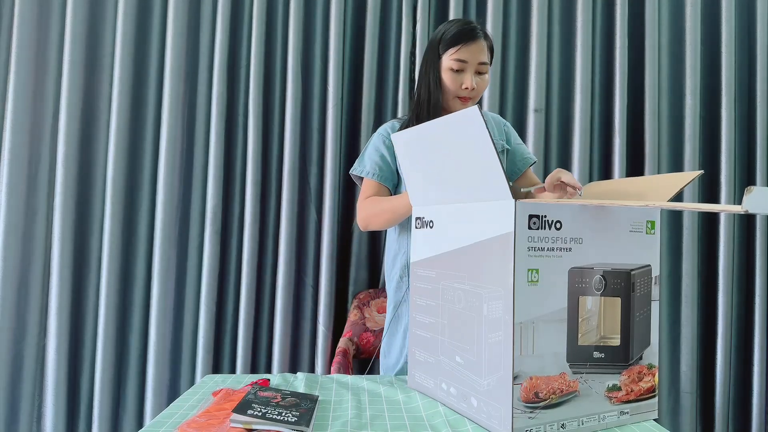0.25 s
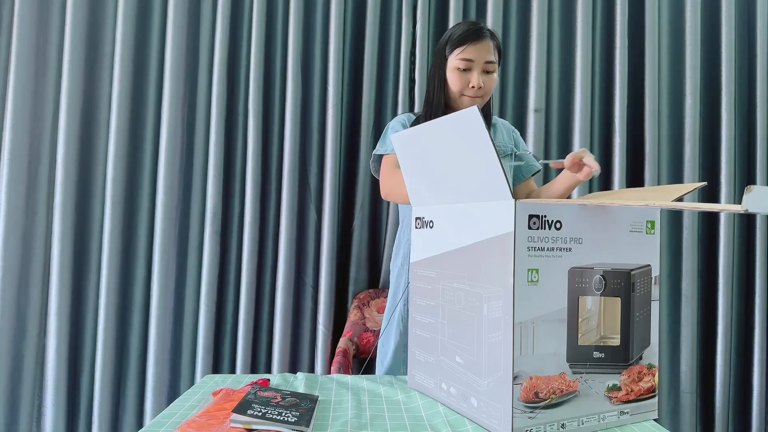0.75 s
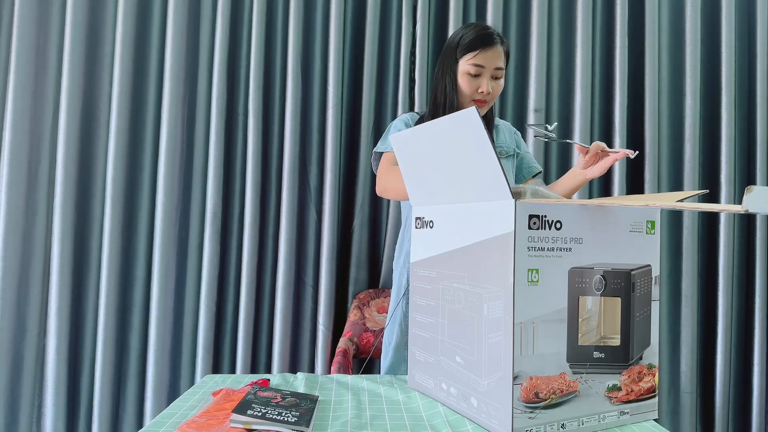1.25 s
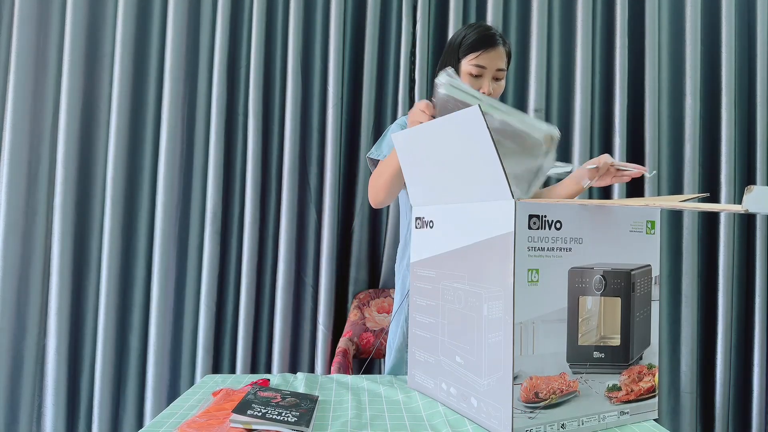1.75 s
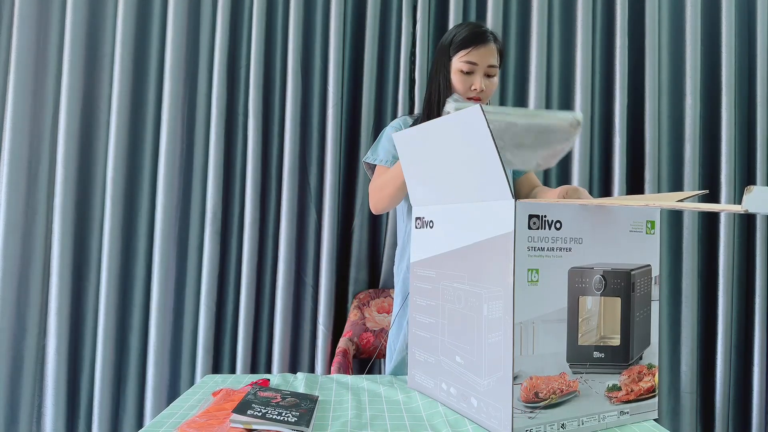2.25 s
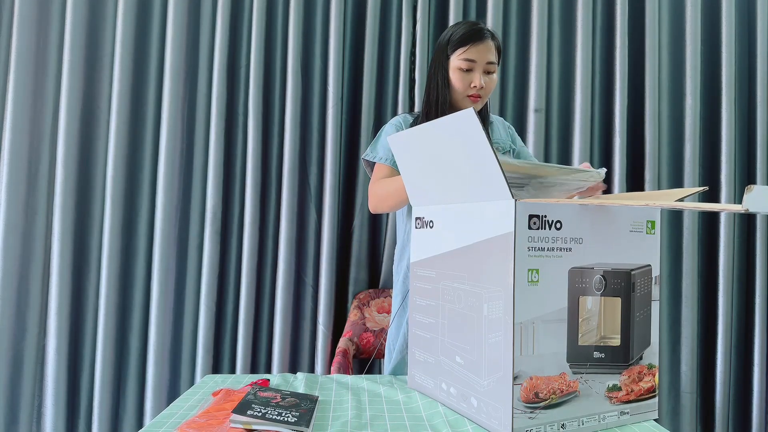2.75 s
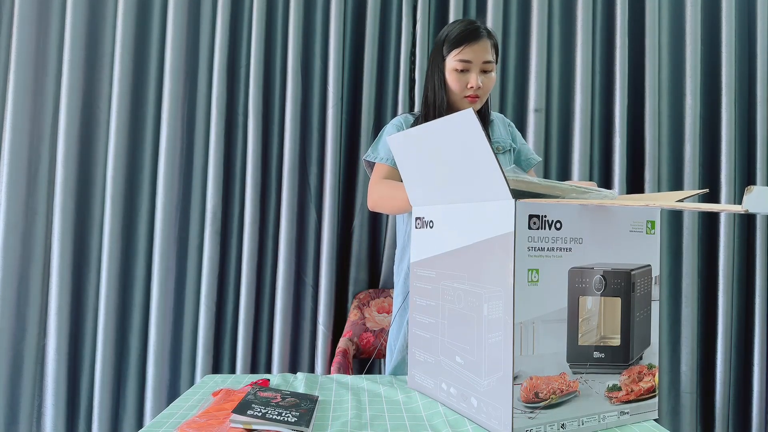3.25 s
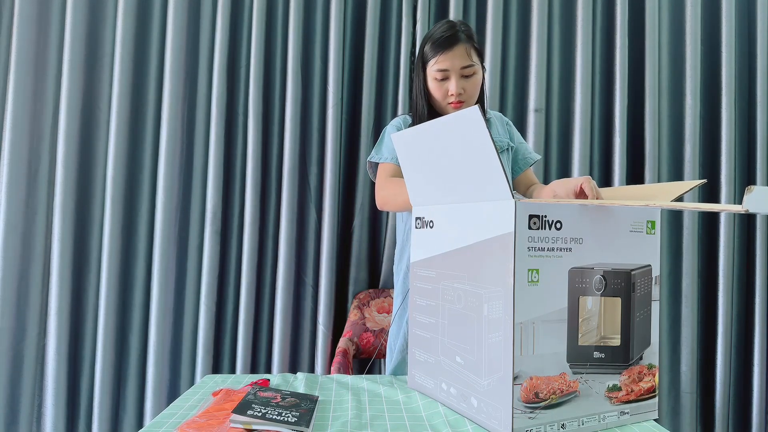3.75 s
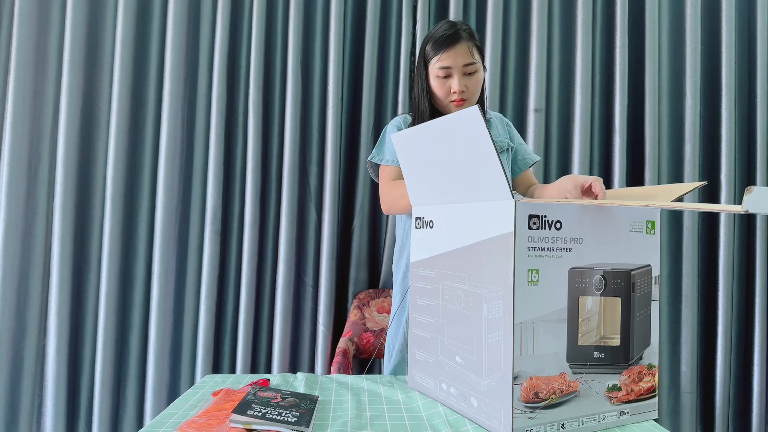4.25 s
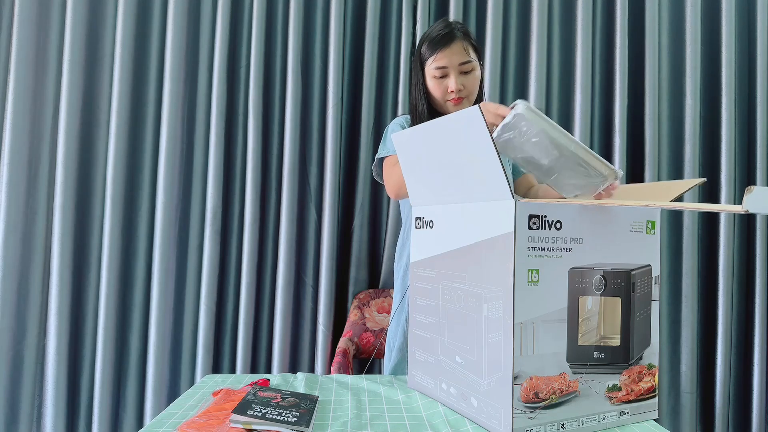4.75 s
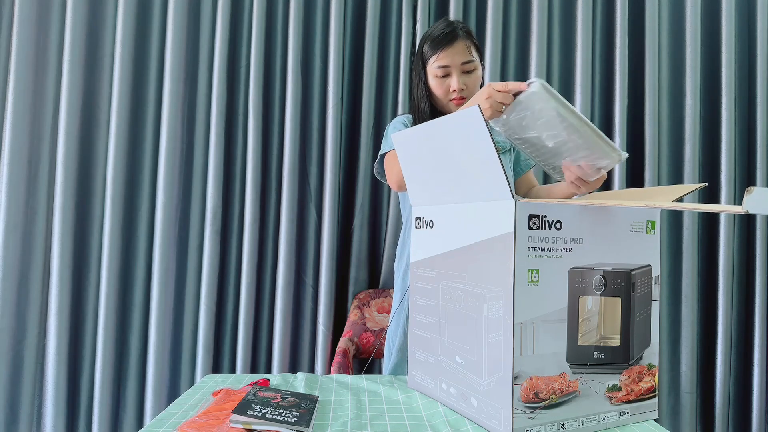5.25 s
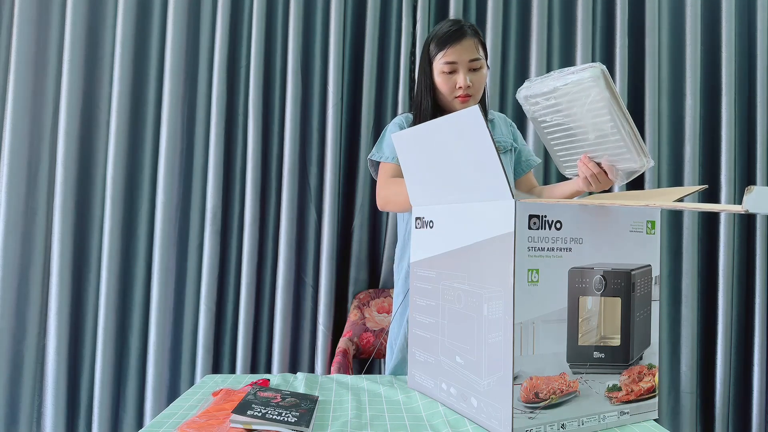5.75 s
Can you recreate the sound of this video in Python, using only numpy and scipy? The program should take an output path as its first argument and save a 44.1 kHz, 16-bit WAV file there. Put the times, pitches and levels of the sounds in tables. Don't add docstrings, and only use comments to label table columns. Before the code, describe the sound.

Plastic film crackles and wire racks knock a hollow cardboard carton as packed parts are lifted out, ending with a metallic tray clank.

```python
import sys
import numpy as np
from scipy import signal
from scipy.fft import rfft, irfft, next_fast_len
from scipy.io import wavfile
from scipy.ndimage import uniform_filter1d, map_coordinates

SR = 44100
rng = np.random.default_rng(int(sys.argv[2]) if len(sys.argv) > 2 else 0)


def natural_amplitude(level_db):
    exponent = np.asarray(level_db, float) / 20
    return 10 ** exponent


def wav_record(signal):
    frames = np.transpose(np.atleast_2d(signal))
    bounded = np.clip(frames, -1, 1)
    quanta = np.round(bounded * 32767).astype(np.int16)
    wavfile.write(sys.argv[1], SR, quanta)


N = 264159


def unit(x):
    return x / np.sqrt(np.mean(x ** 2) + 1e-20)


def along(points, hz):
    f, v = np.transpose(points)
    return np.interp(np.log(hz + 1), np.log(f + 1), v)


def wobble(rate):
    knots = rng.standard_normal(int(N * rate / SR) + 4)
    return map_coordinates(knots, [np.arange(N) * rate / SR])


def filtered(x, points):
    m = next_fast_len(N + 8192)
    gain = natural_amplitude(along(points, np.fft.rfftfreq(m, 1 / SR)))
    return irfft(rfft(x, m) * gain, m)[..., :N]


def coloured(x, spectrum):
    return unit(filtered(x, [(1, -120)] + list(spectrum)))


def swells(rows):
    t = np.arange(0, N, 32) / SR
    s, db, rise, fall = np.transpose(rows)[:, :, None]
    below_peak = 10 * np.maximum((s - t) / rise, (t - s) / fall)
    power = natural_amplitude(2 * (db - below_peak)).sum(axis=0)
    return np.interp(np.arange(N) / SR, t, np.sqrt(power))


def add(track, s, sound):
    spot = track[round(s * SR):][:len(sound)]
    spot += sound[:len(spot)]


def grit(rate, low_hz, high_hz, cycles, spread_db, clump_db, clump_rate, hiss):
    when, pitch, size = rng.random((round(rate * N / SR), 3)).T[:, :, None]
    hz = low_hz * (high_hz / low_hz) ** pitch
    step = np.arange(round(3 * cycles * SR / low_hz))
    level = natural_amplitude(spread_db * np.minimum(-np.log(size), 4)) * np.sqrt(hz)
    tick = level * np.sin(2 * np.pi * hz * step / SR) * np.exp(-step * hz / SR / cycles)
    spots = (when * N).astype(int) + step
    ticks = np.bincount(spots.ravel(), tick.ravel(), N)[:N]
    return natural_amplitude(clump_db * wobble(clump_rate)) * (unit(ticks) + hiss * rng.standard_normal(N))


def ring(modes, t, damping, scatter_db):
    hz, db, t60 = np.transpose(modes)[:, :, None]
    level = natural_amplitude(db + scatter_db * rng.standard_normal(db.shape))
    decay = np.exp(-np.log(1000) * damping * t / t60)
    return (level * decay * np.sin(2 * np.pi * (hz * t + rng.random(hz.shape)))).sum(axis=0)


def struck(modes, rattle, loose_db, scatter_db):
    t = np.arange(SR // 6) / SR
    blow = ring(modes, t, 0.0049 / rattle, scatter_db) * (1 - np.exp(-t / 0.00066))
    chatter = rng.standard_normal(len(t)) * np.exp(-t / (1.7 * rattle)) * (1 - np.exp(-t / 0.001))
    brief = t[:SR // 20]
    damped = ring(modes, brief, 8.0, scatter_db) * np.minimum(brief / 0.00047, 1)
    buzz = signal.fftconvolve(damped, chatter)[:len(t)]
    sound = blow / np.abs(blow).max() + natural_amplitude(loose_db) * buzz / np.abs(buzz).max()
    fade = np.cos(np.pi / 2 * t / t[-1])
    return sound * fade / np.abs(sound).max()


def draught():
    # time in seconds, level in dB
    pushes = [(0.0, -40.5), (0.27, -36), (0.55, -27), (0.9, -30), (1.43, -36.5), (1.67, -28), (1.88, -48.5),
              (2.1, -27), (2.6, -46.5), (2.9, -36), (3.19, -37.5), (3.92, -42.5), (4.17, -34.5),
              (5.99, -36.5)]
    # peak in seconds, level in dB, rise and fall in seconds per 10 dB
    gusts = [(.01, -56, .1, .9), (.4, -40, .044, .6), (.68, -32, .05, .05), (1.18, -34, .12, .024),
             (1.33, -58, .076, .4), (2.13, -42, .044, .106), (2.69, -38.5, .23, .074),
             (3.31, -37, .025, .13), (4.36, -50, 1.6, .3), (4.85, -37, .04, .04), (5.1, -35, .04, .025),
             (5.29, -51, .05, .06), (5.69, -45, .096, .07), (5.85, -41, .35, .9)]
    # frequency in Hz, density in dB per Hz
    push_spectrum = [(1.8, -6.5), (3.0, 5.5), (16, -12), (25, -12), (32, -75.5), (55, -120)]
    buffet_spectrum = [(15, -71), (25, -2), (63, -6.5), (92, -13.5), (140, -26.5), (180, -18.5),
                       (310, -120)]
    s, db = np.transpose(pushes)
    push_level = natural_amplitude(np.interp(np.arange(N) / SR, s, db))
    push = push_level * coloured(rng.standard_normal(N), push_spectrum)
    lumps = natural_amplitude(2.24 * wobble(18)) * rng.standard_normal(N)
    return push + swells(gusts) * coloured(lumps, buffet_spectrum)


def hush():
    # frequency in Hz, density in dB per Hz
    hum_spectrum = [(59, -39), (100, -0.5), (145, -17), (207, -6.5), (373, -21), (804, -22), (1170, -21.5),
                    (1840, -30), (11000, -41.5), (14300, -78), (22000, -120)]
    return natural_amplitude(-66 + 0.5 * wobble(2.8)) * coloured(rng.standard_normal(N), hum_spectrum)


def knock(boom_db, metal_db, loose_s):
    # frequency in Hz, level in dB, t60 in seconds
    wall_modes = [(444, -7, 0.055), (556.6, 10.5, 0.073), (596, -1.5, 0.055), (758, -14, 0.057),
                  (1004, -18, 0.15), (1000, -23, 0.14), (1100, -12, 0.07), (1310, -13, 0.044)]
    air_modes = [(192, -11, 0.12), (249, -4, 0.14), (270.3, -6, 0.26), (313, -6, 0.19), (347.3, -1.5, 0.1)]
    rack_modes = [(1520, -20, .07), (1600, -18, .06), (1815, 0, .11), (1885, -5, .07), (2300, -11, .05),
                  (3070, -6, .05), (3760, -9, .05), (4100, -9, .06), (4390, -10, .05), (5400, -13, .04),
                  (6220, -11, .04), (7470, -14, .04)]
    sound = struck(wall_modes, 0.67 * loose_s, loose_db=-1.6, scatter_db=2.1)
    sound += natural_amplitude(boom_db + 3) * struck(air_modes, 0.67 * loose_s, loose_db=-1, scatter_db=3.1)
    sound += natural_amplitude(metal_db + 1.7) * struck(rack_modes, 0.77 * loose_s, loose_db=2.0, scatter_db=2.0)
    return sound


def knocks():
    # start in seconds, wall peak in dB, metal above wall in dB, looseness in seconds
    taps = [(.012, -25, -5, .0033), (.071, -20.5, -10.5, .005), (.083, -29.5, 6, .0055),
            (.758, -35, -13, .0098), (1.203, -35.5, -9, .0036), (2.929, -30.5, -36, .0017),
            (2.953, -39, -20, .003), (3.204, -38, -20, .0053), (3.481, -8, -15, .0024),
            (3.518, -17, -30, .0021), (3.668, -36, -16, .005), (3.822, -47, -20, .0031),
            (3.9, -46.5, -.6, .0026), (4.142, -39.5, -21, .007), (4.163, -33, -9, .0097),
            (4.226, -32, -8, .009), (4.272, -38, -15, .0074), (4.316, -43, -33, .014),
            (4.615, -31, -15, .002), (5.293, -40, -5, .009)]
    # start in seconds, wall peak in dB, boom above wall in dB, metal above wall in dB
    thuds = [(.6, -38.5, -2, -14), (.712, -31, 0.5, -15), (.96, -47.5, 4.5, -14), (1.083, -42, 3, -6),
             (1.371, -44, -11, -8), (2.05, -41, 2.5, -7.5), (2.143, -49, 3, -18), (2.213, -40, -3, -14),
             (2.445, -41.5, -3, -20), (2.479, -45.5, 9, -21), (2.631, -25, 1.5, -43),
             (2.666, -41.5, 17, -30), (2.696, -55, 26, -28), (3.297, -9, -14.5, -4.5), (3.354, -21, -9, 0),
             (3.556, -34.5, -5, -4.5), (4.484, -39.5, -8, -12), (4.815, -39, -1, -8),
             (5.623, -40.5, 1, -10), (5.97, -28.5, -2, -10)]
    out = np.zeros(N)
    for s, db, metal_db, loose_s in taps:
        add(out, s, natural_amplitude(db - 1.2) * knock(-26, metal_db, loose_s))
    for s, db, boom_db, metal_db in thuds:
        add(out, s, natural_amplitude(db - 1.2) * knock(boom_db, metal_db, loose_s=0.0042))
    return out


def pocks():
    # start in seconds, peak in dB, frequency in Hz, t60 in seconds
    touches = [(.012, -30, 900, .05), (.071, -30, 1000, .05), (.085, -40, 1260, .2), (.085, -40, 1766, .2),
               (.085, -36, 600, .15), (.255, -46, 400, .04), (.28, -48, 480, .05), (.365, -44, 190, .05),
               (.41, -44, 720, .1), (.43, -46, 1100, .08), (.76, -45, 579, .3), (1.176, -44, 520, .04),
               (1.312, -47, 1500, .04), (1.349, -48, 1500, .03), (1.384, -44, 450, .08),
               (2.05, -50, 190, .1), (2.143, -54, 900, .07), (2.215, -52, 1400, .03),
               (2.58, -52, 1000, .03), (2.66, -38, 265, .3), (3.297, -22, 673, .07), (3.354, -30, 610, .12),
               (3.39, -34, 570, .08), (3.41, -36, 600, .08), (3.45, -38, 600, .06), (3.556, -38, 640, .1),
               (4.015, -49, 546, .06), (4.095, -41, 1660, .03), (4.122, -39, 1140, .025),
               (4.162, -39, 760, .12), (4.162, -39, 1700, .07), (4.226, -40, 430, .07),
               (4.273, -40, 1000, .02), (4.317, -41, 400, .05), (4.32, -45, 750, .15), (4.33, -46, 310, .4),
               (4.437, -47, 650, .05), (4.513, -45, 1500, .025), (4.54, -46, 1100, .03),
               (4.564, -44, 440, .04), (4.653, -41, 964, .04), (4.721, -43, 1250, .04),
               (4.778, -43, 800, .04), (5.025, -56, 1070, .07), (5.106, -47, 1600, .025),
               (5.293, -46, 1200, .06), (5.648, -46, 1100, .08), (5.763, -45, 1850, .02),
               (5.76, -46, 320, .04), (5.912, -42, 2540, .4)]
    out = np.zeros(N)
    t = np.arange(SR // 3) / SR
    shape = (1 - np.exp(-t / .0012)) * np.cos(np.pi / 2 * t / t[-1])
    for s, db, hz, t60 in touches:
        waver = uniform_filter1d(rng.standard_normal(len(t)), size=300)
        note = np.sin(2 * np.pi * hz * t + 6 * waver) * np.exp(-np.log(1000) * t / t60)
        add(out, s, natural_amplitude(db - 0.4) * note * shape)
    return out


def pop(hz):
    t = np.arange(SR // 100) / SR
    flip_s = .0007
    flip = rng.standard_normal(len(t)) * t * np.exp(-t / flip_s)
    sheet = np.sin(2 * np.pi * hz * t) * t * np.exp(-t * hz / 0.51)
    sound = np.convolve(flip, sheet)[:len(t)]
    return sound / np.abs(sound).max()


def snaps(rows, extra_db):
    out = np.zeros(N)
    for s, db, hz in rows:
        add(out, s, natural_amplitude(db + extra_db) * pop(hz))
    return out


def loud_creases():
    # start in seconds, peak in dB, centre in Hz
    film_creases = [(.0139, -37.5, 3030), (.0525, -33, 6450), (.0568, -27.5, 8700), (.0811, -25, 3530),
                    (.1944, -36, 10300), (.2437, -39.5, 7750), (.2568, -39.5, 6230), (.7141, -32, 5230),
                    (.7579, -27, 9290), (.7937, -33, 9300), (.822, -39, 8660), (.8757, -35.5, 8200),
                    (.9888, -37, 7650), (1.0003, -28.5, 7700), (1.0809, -34.5, 10300), (1.0897, -31, 10600),
                    (1.11, -28, 8000), (1.222, -37, 7500), (1.3157, -36.5, 8600), (1.326, -38.5, 7160),
                    (1.4015, -38, 9540), (2.052, -43, 8140), (2.2154, -47, 2870), (2.6312, -39.5, 3380),
                    (2.9264, -44, 3400), (2.956, -41, 7900),
                    (3.2266, -40, 8500), (3.255, -38, 8800), (3.2961, -23.5, 3150), (3.3538, -32.5, 4100),
                  (3.4225, -34, 8030), (3.484, -32, 3960), (3.4962, -25, 6200), (3.6599, -41, 7900),
                  (3.7158, -42.5, 7230), (3.819, -38, 9400), (3.8482, -43.5, 8400), (3.8764, -40, 8200),
                  (3.8896, -31, 9400), (3.924, -35, 8700), (3.9858, -41.5, 9330), (4.0862, -33, 6600),
                  (4.1629, -31, 4900), (4.226, -33, 8160), (4.2515, -39, 3460), (4.3265, -42, 9500),
                  (4.515, -36, 9250), (5.1069, -41.5, 9400), (5.2939, -41.5, 8500), (5.3323, -30.5, 9800),
                  (5.6795, -39, 9450), (5.8185, -36.5, 8750), (5.8515, -36, 9400)]
    return snaps(film_creases, extra_db=3.54)


def film_crackle():
    # peak in seconds, level in dB, rise and fall in seconds per 10 dB
    squeezes = [(.03, -51, .1, .05), (.077, -41, .025, .03), (.16, -66, .03, .5), (.39, -57, .04, .15),
                (.8, -53, .13, .25), (.97, -57, .2, .06), (1.095, -54, .03, .19), (1.33, -55, .15, .2),
                (1.4, -57, .04, .15), (2.13, -57, .03, .021), (2.2, -75, .05, .35), (2.462, -66, .012, .03),
                (2.57, -67, .04, .05), (2.651, -66, .022, .09), (2.971, -52, .11, .035),
                (3.1, -60, .05, .3), (3.27, -55, .1, .05), (3.302, -41, .006, .045), (3.36, -45, .012, .06),
                (3.42, -50, .05, .07), (3.495, -53.5, .05, .24), (3.904, -65, .15, .16),
                (4.09, -56, .012, .15), (4.17, -47, .03, .07), (4.24, -52, .03, .08), (4.522, -55, .14, .1),
                (4.635, -51, .05, .1), (4.79, -49, .15, .08), (5.04, -64, .1, .5), (5.305, -49, .009, .06),
                (5.365, -48, .04, .033), (5.655, -49, .015, .07), (5.76, -59, .07, .1),
                (5.865, -48, .09, .03), (5.912, -39, .005, .045)]
    # frequency in Hz, density in dB per Hz
    film_spectrum = [(1350, -53), (2300, -8), (3340, -4), (5280, -4.5), (7830, 0), (10300, 0.5),
                     (11000, -2), (14300, -10), (22000, -120)]
    crackle = grit(1400, 2470, 13000, cycles=1.3, spread_db=3.2, clump_db=1.6, clump_rate=60, hiss=0.75)
    return natural_amplitude(-0.4) * swells(squeezes) * coloured(crackle, film_spectrum)


def card_scrape():
    # peak in seconds, level in dB, rise and fall in seconds per 10 dB
    slides = [(.092, -36, .045, .04), (.17, -55, .04, .16), (.432, -47, .055, .058),
              (.776, -56.5, .22, .17), (1.105, -53, .1, .18), (1.379, -55, .12, .134),
              (2.063, -73, .014, .3), (2.232, -61, .05, .043), (2.477, -68, .03, .22),
              (2.637, -60, .05, .1), (2.946, -59.5, .14, .11), (3.27, -60, .21, .3), (3.4, -57, .1, .1),
              (3.525, -43, .07, .07), (3.62, -59, .05, .27), (3.904, -62, .15, .27), (4.1, -53, .02, .15),
              (4.168, -51, .05, .21), (4.62, -56, .25, .15), (4.79, -52, .21, .06), (4.95, -74, .05, .9),
              (5.315, -51, .016, .064), (5.655, -53, .025, .09), (5.875, -55, .21, .05),
              (5.929, -43.5, .022, .3)]
    # frequency in Hz, density in dB per Hz
    card_spectrum = [(260, -36), (450, -3.5), (559, -9), (761, -6), (875, -9), (1430, -7), (1710, -9),
                     (2400, -18), (4200, -31), (7500, -120)]
    rasp = grit(450, 474, 2200, cycles=1.4, spread_db=2.5, clump_db=1.95, clump_rate=55, hiss=3.1)
    return natural_amplitude(-0.2) * swells(slides) * coloured(rasp, card_spectrum)


def carton_drum():
    # peak in seconds, level in dB, rise and fall in seconds per 10 dB
    shoves = [(.1, -67, .9, .9), (.385, -51, .03, .25), (.72, -58, .3, .06), (1.095, -55, .17, .12),
              (1.419, -60.5, .16, .1), (2.247, -55, .06, .1), (2.49, -44, .021, .08),
              (2.67, -35, .022, .095), (2.8, -62, .05, .21), (3.325, -41, .015, .08), (3.52, -41, .12, .11),
              (4.33, -52, .18, .22), (4.822, -49, .07, .08), (5.33, -56, .025, .08), (5.63, -52, .05, .21),
              (5.93, -45, .015, .6)]
    # frequency in Hz, density in dB per Hz
    drum_spectrum = [(76, -64), (130, -8), (231, -7.5), (269, -6), (296, -4), (351, -3), (500, -9),
                     (650, -24.5), (1100, -120)]
    rumble = grit(90, 150.6, 474, cycles=1.75, spread_db=2, clump_db=1.6, clump_rate=24, hiss=3.6)
    return swells(shoves) * coloured(rumble, drum_spectrum)


def faint_creases():
    # start in seconds, peak in dB, centre in Hz
    small_creases = [(0.6005, -47, 4940), (0.6569, -50, 6380), (0.8131, -36, 8990), (0.9318, -45, 9780),
                     (0.9472, -41, 9850), (0.9682, -37, 10200), (1.1628, -39, 6970), (1.1947, -39, 7780),
                     (1.2785, -37, 8420), (1.3508, -40, 6770), (1.4616, -47, 9490), (1.5384, -47, 8540),
                     (2.83, -45, 8260), (2.9841, -41, 8390), (3.0824, -48, 7470), (3.1178, -46, 5910),
                     (3.1966, -42, 8230), (3.3974, -34, 8050), (3.5524, -40, 8810), (3.5954, -40, 8470),
                     (3.6027, -39, 7310), (3.6252, -43, 8800), (3.6676, -41, 7850), (3.7863, -50, 8590),
                     (4.1205, -38, 9390), (4.1984, -36, 8470), (4.2742, -39, 8150), (4.4084, -44, 7690),
                     (4.4852, -44, 8190), (4.6972, -42, 6510), (4.7202, -36, 9600), (4.777, -38, 8140),
                     (4.815, -40, 9430), (4.8494, -38, 5710), (4.8658, -39, 5590), (4.8983, -45, 9080),
                     (4.9487, -48, 10000), (4.9721, -50, 9020), (5.0135, -52, 9220), (5.0524, -49, 8650),
                     (5.0729, -52, 5210), (5.234, -51, 5460), (5.3707, -39, 8800), (5.5293, -56, 10100),
                     (5.6251, -43, 9370), (5.6501, -38, 8310), (5.7079, -45, 5660), (5.7658, -44, 8900),
                     (5.8341, -39, 8070),
                     (1.3828, -41, 8600), (2.9054, -44, 7870), (3.2152, -42, 8000), (3.2905, -40, 9000),
                (3.3873, -41, 9000), (3.4105, -39, 10500), (3.432, -40, 9500), (3.4711, -40, 7600),
                (3.8645, -44, 9560), (3.9733, -47, 3490), (4.1406, -37, 9050), (4.4993, -44, 3750),
                (5.2865, -47, 9070), (5.7958, -42, 8800), (5.8916, -40, 7000)]
    return snaps(small_creases, extra_db=-1.5)


def wires():
    # start in seconds, length in seconds, frequency in Hz, level in dB
    tones = [
        (1.5, .1, 1170, -67),
        (1.57, .1, 3495, -80),
        (1.64, .24, 1130, -71),
        (1.76, .09, 4200, -79),
    ]
    out = np.zeros(N)
    for s, length, hz, db in tones:
        drift = 1 + 0.0087 * wobble(30)[:round(length * SR)]
        tone = np.sin(2 * np.pi * hz * np.cumsum(drift) / SR)
        add(out, s, natural_amplitude(db) * np.hanning(len(drift)) * tone)
    return out


def tray_clank():
    # start in seconds, peak in dB
    clanks = [
        (5.9058, -17),
    ]
    # frequency in Hz, level in dB, t60 in seconds
    tray_modes = [(330, 1, 0.027), (1006, -3, 0.043), (1495, -13, 0.25), (1986, -1.5, 0.11),
                  (2040, -13, 0.098), (2550, -12.5, 0.35), (3080, 3.5, 0.057), (3700, -14, 0.13),
                  (4000, -10, 0.099), (4530, -16, 0.12), (5170, -11.5, 0.097), (5593, -18, 0.14),
                  (7360, -16, 0.092), (8000, -9.5, .07)]
    out = np.zeros(N)
    for s, db in clanks:
        add(out, s, natural_amplitude(db + 2.0) * struck(tray_modes, 0.0045, loose_db=0.5, scatter_db=0.5))
    return out


def room(x):
    # frequency in Hz, t60 in seconds
    decay_times = [(200, 0.19), (1000, 0.53), (3000, 0.34), (10000, 0.12)]
    hz, t, z = signal.stft(rng.standard_normal(SR // 2), SR, nperseg=256)
    fading = z * natural_amplitude(-60 * t / along(decay_times, hz)[:, None])
    tail = signal.istft(fading, SR, nperseg=256)[1]
    delayed = np.pad(x, (200, 0))
    return signal.fftconvolve(delayed, tail / np.linalg.norm(tail))[:N]


def scene():
    air = draught() + hush()
    bumps = knocks() + tray_clank()
    creases = loud_creases()
    light = faint_creases() + pocks()
    handling = film_crackle() + card_scrape() + carton_drum()
    answer = natural_amplitude(-13) * room(bumps) + natural_amplitude(-13.5) * room(creases) + natural_amplitude(-13.2) * room(light)
    return (air + bumps + creases + light + handling + wires() + answer)[None]


def band_limit(x):
    return signal.sosfilt(signal.butter(12, 16460, fs=SR, output="sos"), x)


def record(dry):
    # frequency in Hz, gain in dB
    roll_off = [(1950, -1.6), (2300, -4), (2750, -1.6), (9500, -1.5), (11000, -5.5), (12500, -8.5),
                (14500, -15.5), (17000, -33.5)]
    heard = filtered(dry, roll_off)
    hiss = natural_amplitude(-86) * rng.standard_normal(heard.shape)
    whine = natural_amplitude(-99) * np.sin(2 * np.pi * 15700 * np.arange(N) / SR)
    return band_limit(heard + hiss + whine)


dry = scene()
out = record(dry)
wav_record(out)
```